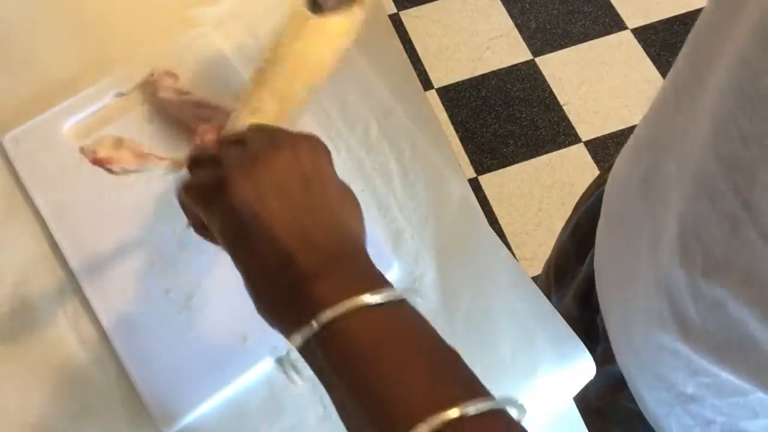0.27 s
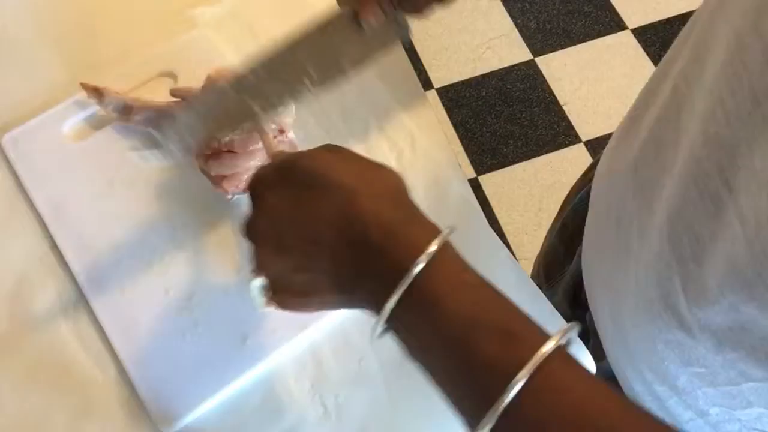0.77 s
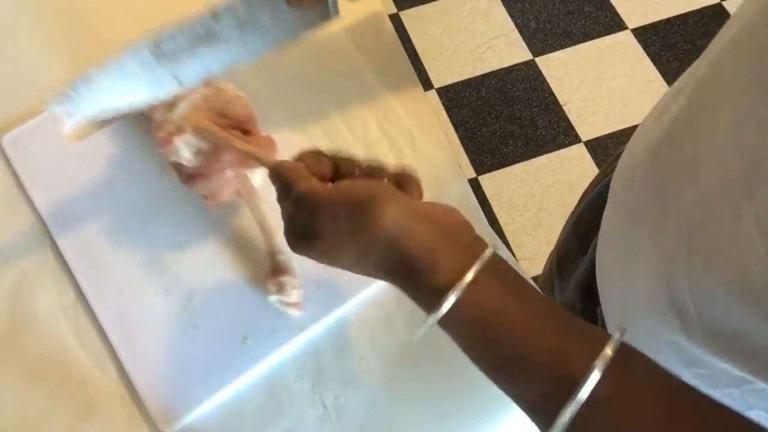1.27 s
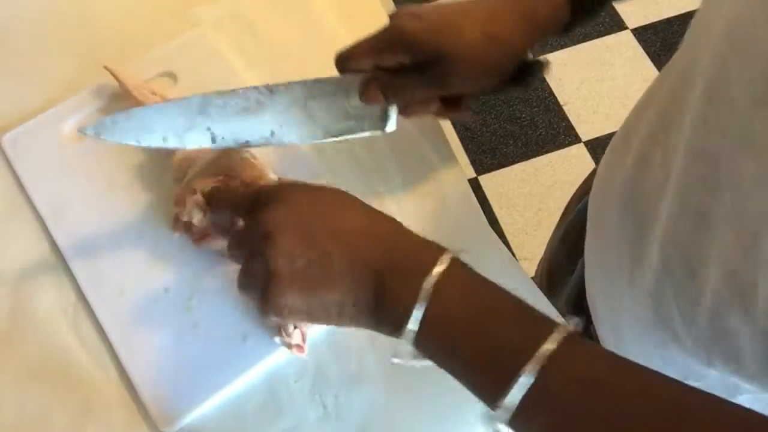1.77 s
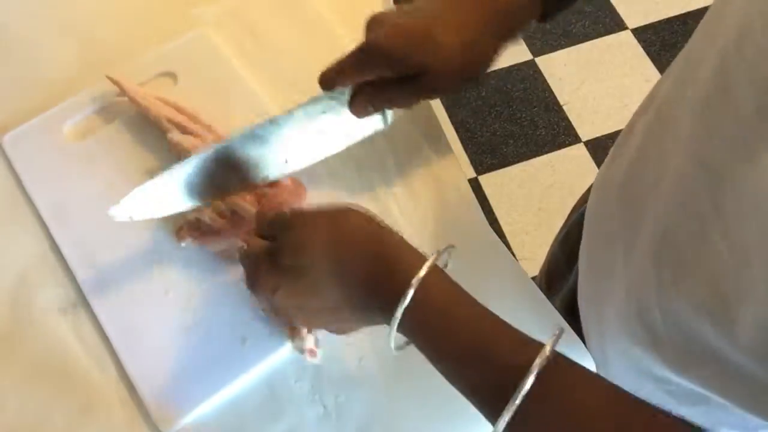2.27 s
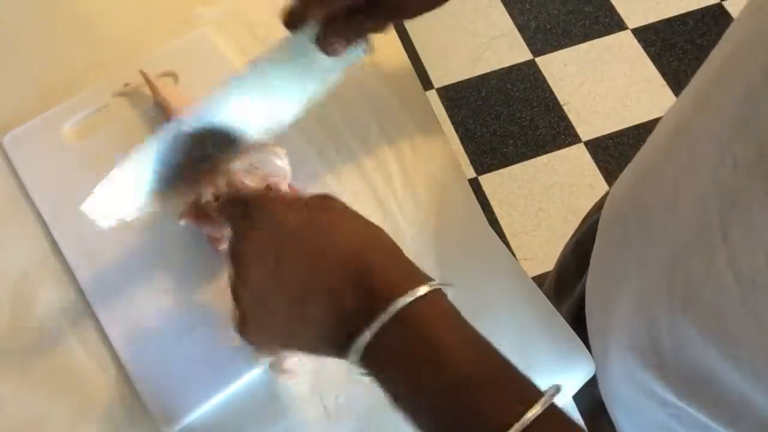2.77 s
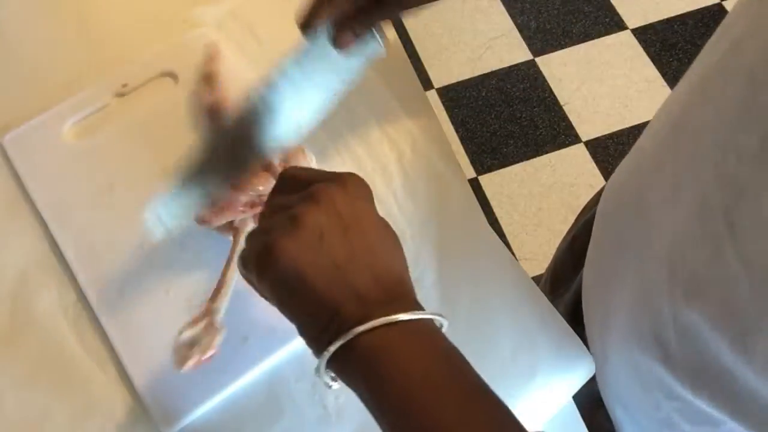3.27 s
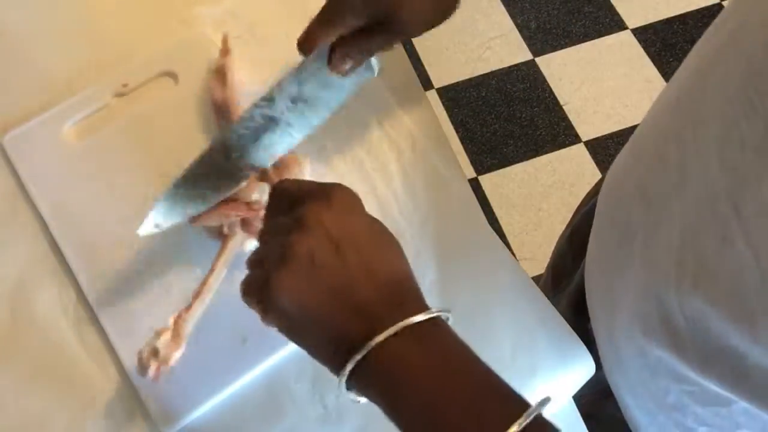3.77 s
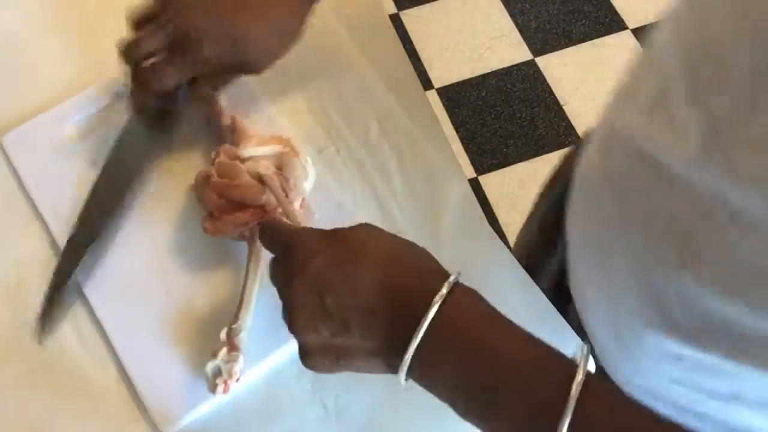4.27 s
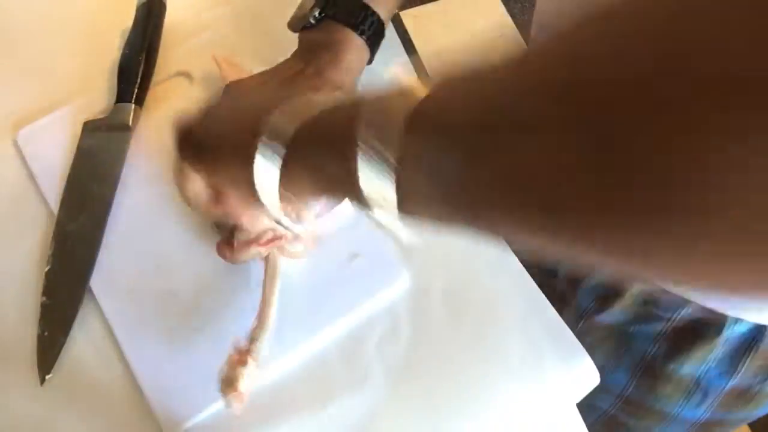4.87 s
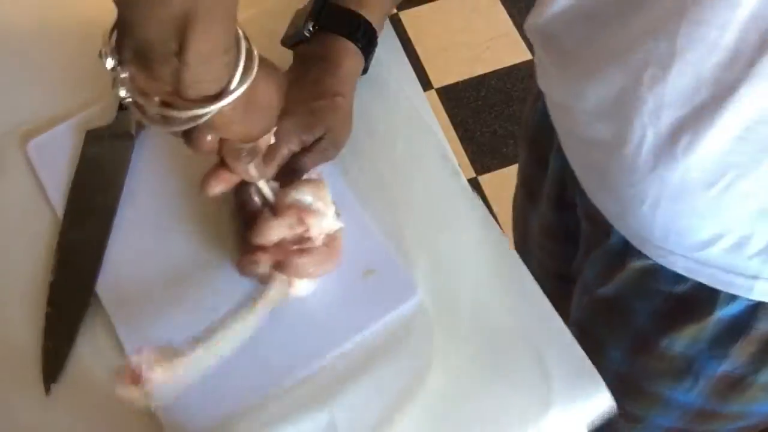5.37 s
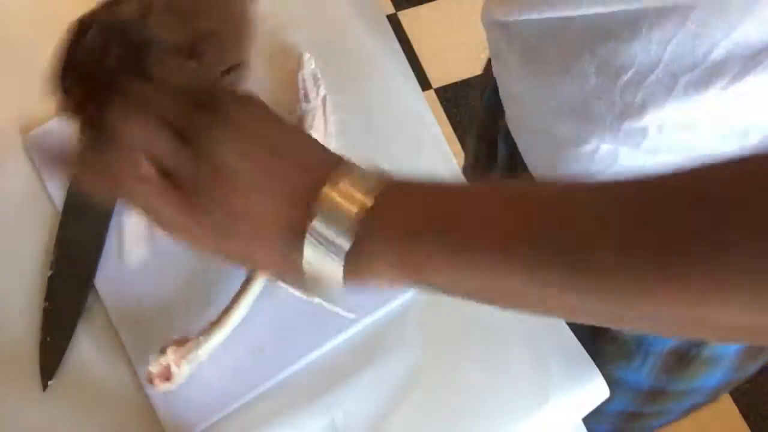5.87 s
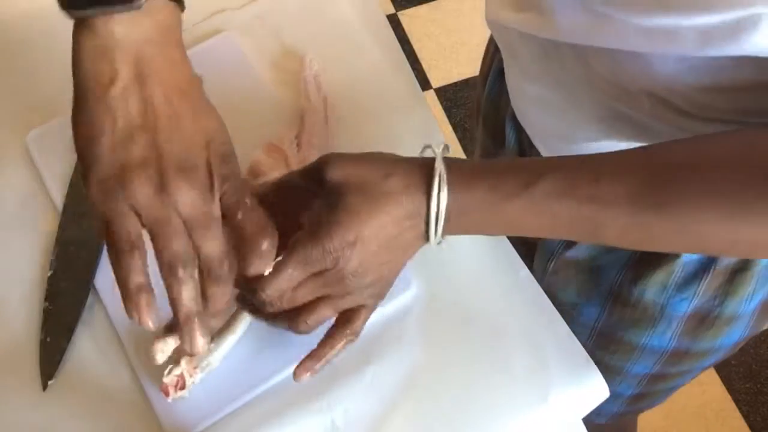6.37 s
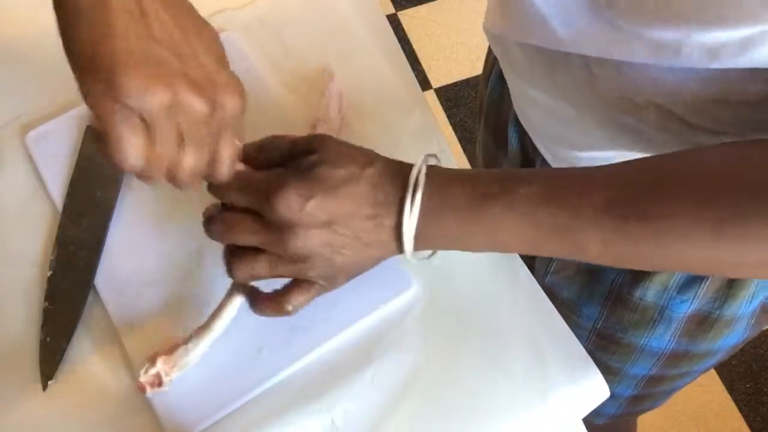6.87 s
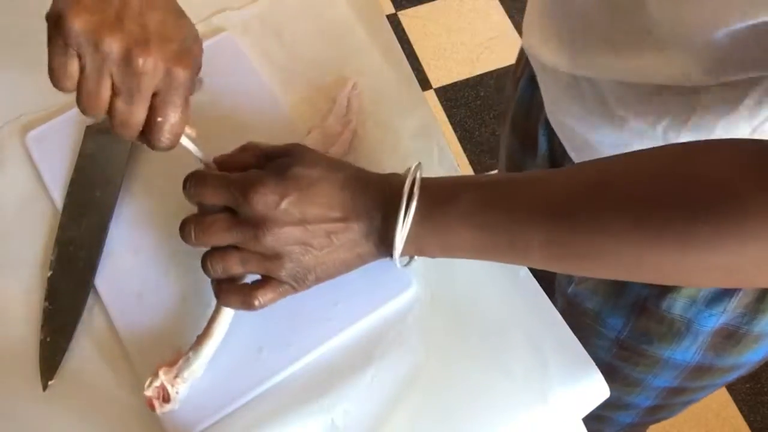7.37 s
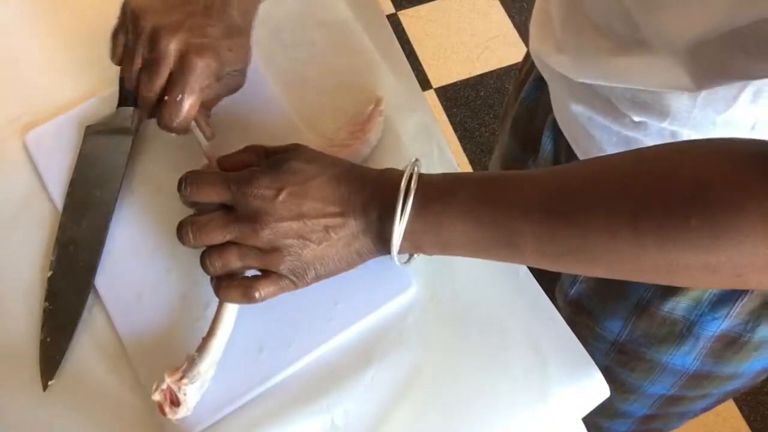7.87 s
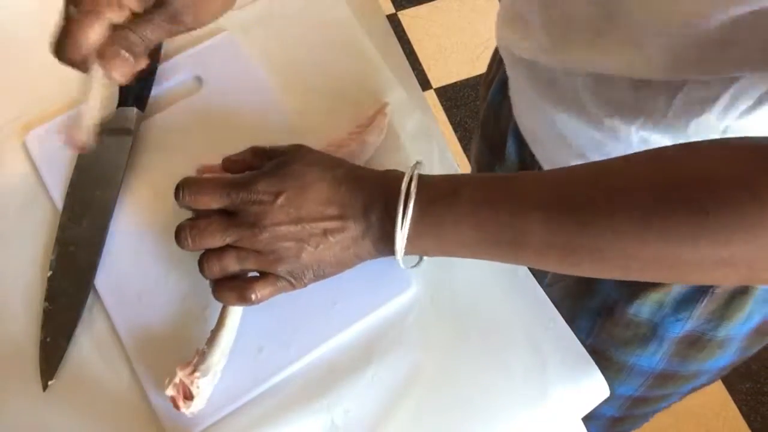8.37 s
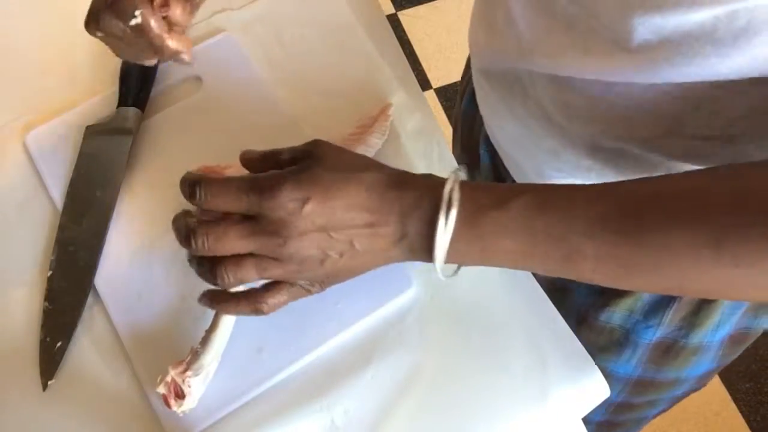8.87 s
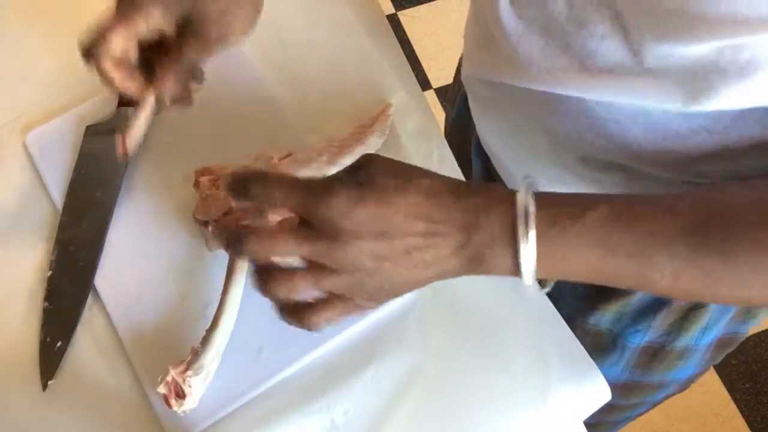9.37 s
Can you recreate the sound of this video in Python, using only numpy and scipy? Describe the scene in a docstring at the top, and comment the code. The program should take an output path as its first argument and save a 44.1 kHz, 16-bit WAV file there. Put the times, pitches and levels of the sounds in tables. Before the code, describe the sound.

A knife rasps and taps on bone, clatters onto a plastic board, then hands tear meat with gristle snaps and thin bangle clinks.

```python
"""A knife blade taps and rasps on bone: each stroke is many tiny catches that set off short ringing.
The knife then clatters onto a plastic board and meat is pulled off by hand, as a crackle of noise bursts.
Gristle snaps, thin bangles clink as fading tones, damp fingers squelch, and the bone is put down with a knock.
Soft bumps and a dull scuff pass by, and a small kitchen answers each sound with a short tail of noise.
Behind it all are rushing air, a low hum of a few sine tones and a thin electric buzz."""
import sys
import numpy as np
from scipy import signal
from scipy.fft import rfft, irfft, next_fast_len
from scipy.io import wavfile
from scipy.ndimage import map_coordinates

SR = 44100
rng = np.random.default_rng(int(sys.argv[2]) if len(sys.argv) > 2 else 0)


def to_wav(s):
    """Save 16-bit WAV."""
    ch = np.atleast_2d(s).T  # columns
    pcm = np.round(np.clip(ch, -1, 1) * 32767)  # PCM
    wavfile.write(sys.argv[1], SR, pcm.astype(np.int16))


N = 423801  # samples in the whole scene
SIZE = 16384  # samples in one event
T = np.arange(SIZE) / SR  # time within an event, in seconds
HZ = np.fft.rfftfreq(SIZE, 1 / SR)  # frequencies within an event

# In every table t60_s is the time in which a ring fades by 60 dB.


def amp(db):
    """Turn decibels into a gain."""
    return 10 ** (np.asarray(db) / 20)


def unit(x):
    """Scale to an average (rms) level of 1."""
    return x / np.sqrt(np.mean(x ** 2) + 1e-20)


def along(points, hz):
    """Read a curve of (Hz, value) points on a log frequency axis."""
    point_hz, values = np.transpose(points)
    return np.interp(np.log(hz + 1), np.log(point_hz + 1), values)


def wobble(rate):
    """A smooth random curve with rate new random values a second."""
    knots = rng.standard_normal(int(N * rate / SR) + 4)
    return map_coordinates(knots, [np.arange(N) * rate / SR])


def filtered(x, response):
    """Filter a whole track with a gain that depends on frequency."""
    padded = next_fast_len(N + SR // 2)
    spectrum = rfft(x, padded) * response(np.fft.rfftfreq(padded, 1 / SR))
    return irfft(spectrum, padded)[..., :N]


def colour(x, points):
    """Filter one event to a (Hz, dB) shape, with no sound ahead of its cause."""
    cepstrum = irfft(np.log(amp(along(points, HZ))))
    # folding the cepstrum forward makes the filter minimum-phase
    cepstrum[1:SIZE // 2] *= 2
    cepstrum[SIZE // 2 + 1:] = 0
    impulse = irfft(np.exp(rfft(cepstrum)))
    return signal.fftconvolve(x, impulse)[:SIZE]


def voiced(x, levels, length):
    """Steer each band of an event towards its level, judged over the first length seconds."""
    # low, mid, high and top band: from_hz, to_hz
    band_edges = [(90, 600), (600, 2000), (2000, 6500), (6500, 16000)]
    power = 2 * np.abs(rfft(x * (T < length))) ** 2 / (SIZE * length * SR)
    shape = []
    for db, (low_hz, high_hz) in zip(levels, band_edges):
        inside = (HZ > low_hz) & (HZ < high_hz)
        gain_db = db - 10 * np.log10(power[inside].sum() + 1e-20)
        # flat inside the band, sloping over to its neighbours
        shape += [(low_hz * 1.3, gain_db), (high_hz / 1.3, gain_db)]
    return colour(x, shape)


def ring(modes, scatter_db, detune):
    """Sum fading sine modes (Hz, dB, t60), with new strengths and slight pitch shifts at every contact."""
    chance = rng.standard_normal((len(modes), 2))
    total = 0
    for (hz, db, t60), (strength, shift) in zip(modes, chance):
        fade = amp(db + scatter_db * strength - 60 * T / t60)
        total = total + fade * np.sin(2 * np.pi * hz * (1 + detune * shift) * T)
    return total


def tone(hz, t60):
    """One resonance: a fading sine."""
    return amp(-60 * T / t60) * np.sin(2 * np.pi * hz * T)


def crack(t60):
    """The fading burst of noise at a contact."""
    return amp(-60 * T / t60) * rng.standard_normal(SIZE)


def slips(length, crest_share, rate, spread_db, edge_db):
    """Tiny catches of uneven size, swelling to a crest and stopping after length seconds."""
    crest = length * crest_share
    swell_db = np.interp(T, [0, crest / 2, crest, length], [edge_db, edge_db / 4, 0, edge_db / 1.65])
    happens = rng.random(SIZE) < rate / SR
    sizes = amp(spread_db * np.minimum(rng.exponential(size=SIZE), 3))
    signs = rng.choice([-1, 1], SIZE)
    return happens * sizes * signs * amp(swell_db) * (T < length)


def add(track, s, sound, room_db):
    """Place a sound at s seconds, with the kitchen's answer swelling over the next milliseconds."""
    # how long the kitchen rings at each pitch: pitch_hz, t60_s
    kitchen_decay = [(150, 0.32), (400, 0.44), (1000, 0.51), (3000, 0.44), (7000, 0.39), (15000, 0.24)]
    hz, t, grains = signal.stft(rng.standard_normal(SIZE), SR, nperseg=256)
    fading = grains * amp(-60 * t / along(kitchen_decay, hz)[:, None])
    tail = signal.istft(fading, SR, nperseg=256)[1][:SIZE]
    tail = tail * (1 - np.exp(-(T / 0.0015) ** 2))
    answer = amp(room_db) * tail / np.linalg.norm(tail)
    heard = signal.fftconvolve(sound, (T == 0) + answer)
    at = round(s * SR)
    heard = heard[max(-at, 0):max(N - at, 0)]
    track[max(at, 0):][:len(heard)] += heard


def scraping():
    """The edge catches and slips along the bone; the resonances change as it travels."""
    # strokes of the blade: start_s, length_s, level_db, squeak_hz, lowest_ring_hz
    strokes = [(-.03, 0.03, -26.5, 3570, 1300), (0.193, .029, -19, 2770, 700), (.426, .035, -19, 3540, 700),
               (0.931, 0.073, -24.5, 3840, 1900), (1.193, 0.067, -26, 3750, 1900),
               (2.068, 0.076, -30.5, 3640, 1700), (2.383, 0.019, -20.5, 3880, 1700),
               (2.604, .018, -17.5, 4040, 1700), (2.94, 0.052, -27, 3080, 1900),
               (3.205, 0.041, -20.5, 3540, 2800), (3.421, 0.038, -24, 3110, 2800),
               (3.639, 0.039, -26, 3140, 2700), (3.885, 0.032, -36.5, 2800, 2500)]
    # colour of the catches: pitch_hz, level_db (relative)
    rasp_colour = [(100, 22.5), (500, 11.5), (1000, -9), (1900, -1.5), (2350, -7.5), (3300, 0.5),
                   (4700, 0.5), (6200, -0.5), (8500, 1.5), (10400, -7), (11500, -4), (15500, -1.5)]
    # low, mid, high, top band against the stroke's level [dB]
    rasp_bands_db = (-34, -13, 0, -6.5)
    choke_hz, choke_db_per_octave = 1800, 3.5  # the mid band thins as the lowest ring climbs past this pitch
    track = np.zeros(N)
    for start, length, db, squeak_hz, lowest_hz in strokes:
        catches = slips(length, crest_share=.62, rate=7000, spread_db=3.5, edge_db=-19)
        catches = colour(catches, rasp_colour)
        # fade from one set of resonances to another
        travel = np.clip(T / length, 0, 1) * np.pi / 2
        first = signal.fftconvolve(catches * np.cos(travel), contact(squeak_hz))[:SIZE]
        last = signal.fftconvolve(catches * np.sin(travel), contact(squeak_hz))[:SIZE]
        # the firmer the blade is pressed, the more of its lower modes are choked
        rasp = colour(first + last, [(0.84 * lowest_hz, -11), (lowest_hz, 0)])
        low_db, mid_db, high_db, top_db = db + np.array(rasp_bands_db)
        choke_db = choke_db_per_octave * np.log2(lowest_hz / choke_hz)
        levels = [low_db, mid_db - choke_db, high_db, top_db]
        add(track, start, voiced(rasp, levels, length), room_db=-10.5)
    return track


def contact(squeak_hz):
    """How blade and bone answer one catch: a tick, the blade's modes, a squeak and the bone's many short modes."""
    squeak = amp(-23) * tone(squeak_hz, t60=.008)
    steel = amp(-30) * blade(t60=.035)
    bone = amp(-12.0) * crack(t60=0.0051)
    return (T == 0) + steel + squeak + bone


def blade(t60):
    """The blade's ring; grip and point of contact shift its modes a little."""
    # modes of the blade: pitch_hz, level_db (relative)
    blade_modes = [(700, -4.5), (1260, 2.5), (1750, -2.5), (2025, 2.5), (2710, 4), (3200, -11.5),
                   (3460, -3), (3810, -10), (4090, -3.5), (5040, -16.5), (5800, -21), (6060, -2),
                   (6480, -10.5), (6800, -4.5), (7320, -1), (7810, -8.5), (8450, -15), (9790, -0.5),
                   (10900, -14.5), (12100, 0.5), (13350, -3.5), (14900, -6)]
    return ring([(hz, db, t60) for hz, db in blade_modes], scatter_db=3, detune=.011)


def tapping():
    """The blade lands on the bone, damped by the meat."""
    # blade set against the bone: start_s, level_db
    taps = [(.1472, -32), (0.3887, -36), (0.9068, -26.5), (1.1903, -23.5), (2.346, -25), (2.5763, -25.5),
            (2.9142, -29.5), (3.175, -35), (3.4035, -33), (3.6303, -25.5), (3.8385, -35), (3.8913, -28)]
    # low, mid, high, top band against the tap's level [dB]
    tap_bands_db = (-24, -8.5, -1, -20)
    track = np.zeros(N)
    for s, db in taps:
        bone = amp(-2) * tone(2900, t60=.016)
        tap = crack(t60=0.025) + amp(-14.5) * blade(t60=0.034) + bone
        add(track, s, voiced(tap, db + np.array(tap_bands_db), 0.0077), room_db=-6.5)
    return track


def dropping_knife():
    """The knife clatters down on the board and its loose steel rings."""
    # blows of the knife: start_s, pitch_hz, level_db, boom_db, hardness_db, steel_ring_db
    knife_drops = [(4.2939, 1320, -20, -4, 1, -36), (4.3825, 1200, -25.5, -8, 4.5, -22),
                   (4.4138, 692, -22.5, 1, 7.5, -26), (4.419, 521, -19.5, 2, 1.5, -11),
                   (4.4705, 930, -26, -1, 7, -28.5)]
    # modes of the whole knife when let go: pitch_hz, level_db (relative), t60_s
    knife_modes = [(2379, -10, .09), (2780, -7, .07), (3180, -10, .08), (3531, -6, .1), (4113, -8, .11),
                   (5040, -9, .1), (6250, -8, .14), (6807, 0, .12), (7300, -4, .12), (8517, 1, .16)]
    track = np.zeros(N)
    for s, *hit, ring_db in knife_drops:
        steel = amp(ring_db) * ring(knife_modes, scatter_db=9, detune=0.0011)
        add(track, s, blow(*hit, steel=steel, board_db=-4), room_db=-7.0)
    return track


def knocking():
    """Bone and hand knock on the board, whose ring is damped by a hand."""
    # knocks: start_s, pitch_hz, level_db, boom_db, hardness_db
    knocks = [(1.137, 1264, -19, -11, -12.5), (2.7505, 410, -43, 6, -26), (4.0679, 1234, -27.5, -3, -15),
              (6.7806, 253, -46.5, 10.5, -6), (7.1258, 1270, -28, -24, -11.5),
              (7.1895, 2900, -31.5, -16, -3.5), (7.2128, 1470, -26.5, -17.5, -16),
              (8.2122, 1900, -28, -7.5, 1.5), (8.2158, 1000, -22, -6.5, 4), (9.607, 1467, -19.5, -29, -2.5)]
    track = np.zeros(N)
    for s, *hit in knocks:
        add(track, s, blow(*hit, steel=0, board_db=-7.5), room_db=-7.5)
    return track


def blow(hz, db, boom_db, hardness_db, steel, board_db):
    """One blow on the board: a clack at its own pitch, any steel that rings with it, and the board's boom."""
    # colour of a blow: pitch_hz, level_db (relative)
    clack_colour = [(40, -9), (120, -3), (250, 3.5), (520, 2.5), (800, -0.5), (1100, 2.5), (3500, 0.5),
                    (7500, -7.5), (9500, -16), (15500, -20.5)]
    # modes of the board on its counter: pitch_hz, level_db (relative), t60_s
    board_modes = [(135, -7, .3), (170, 0, .38), (205, -8, .25), (238, -3, .33), (325, -4, .16),
                   (374, -3, .14), (480, -5, .05), (545, -7, .05), (695, -6, .06)]
    pitch = amp(-4) * tone(hz, t60=.013)
    clack = colour(crack(t60=0.035) + pitch + steel, clack_colour)
    # a harder blow lifts the high band, and the top band faster
    top_db = -11 + 1.5 * hardness_db
    levels = db + np.array([boom_db, 0, hardness_db, top_db])
    boom = amp(db + boom_db + board_db) * ring(board_modes, scatter_db=3.0, detune=0.01)
    # the heavy board takes a few milliseconds to get moving
    boom = boom * (1 - np.exp(-T / 0.0035))
    return voiced(clack, levels, 0.0081) + boom


def pulling():
    """Wet meat tears in a crackle of parting fibres, denser the harder the pull."""
    # tears: start_s, length_s, level_db
    pulls = [(4.695, 0.07, -44), (4.754, 0.063, -40.5), (5.381, .105, -30.5), (5.726, 0.18, -49.5),
             (7.184, .064, -42)]
    # low, mid, high, top band against the tear's level [dB]
    pull_bands_db = (-26, -12, 0, -12)
    track = np.zeros(N)
    for start, length, db in pulls:
        fibres_per_s = 1500 * amp(.35 * (db + 31))
        tear = crackle(length, fibres_per_s)
        add(track, start, voiced(tear, db + np.array(pull_bands_db), length), room_db=-6.5)
    return track


def crackle(length, rate):
    """Wet fibres part one after another, each with a tick, a short tone and a little noise."""
    fibres = slips(length, crest_share=0.27, rate=rate, spread_db=5, edge_db=-10)
    snap = (T == 0) + amp(-9.5) * tone(3300, t60=0.00095) + amp(-19) * crack(t60=0.0047)
    return signal.fftconvolve(fibres, snap)[:SIZE]


def snapping():
    """Tough gristle gives way in single snaps of noise and a short tone."""
    # snaps: start_s, level_db, brightness_db
    snaps = [(1.553, -45, 6), (4.719, -47.5, 4), (4.7771, -33.5, -3), (4.9138, -46.5, -1),
             (4.9447, -45.5, 3), (5.1857, -50, -1.5), (5.3936, -32, 4), (5.4216, -28.5, 9),
             (5.429, -34.5, 2), (5.448, -29.5, 4.5), (5.451, -25, 6), (5.4894, -24.5, -1.5),
             (5.824, -40, -5), (5.846, -29, -8), (6.759, -45, -19), (7.312, -43, -14), (7.374, -45, -17),
             (7.496, -38.5, -5), (7.5083, -42.5, -8), (8.1798, -44, 13), (9.4526, -37, 6)]
    # low, mid, high, top band against the snap's level [dB]
    snap_bands_db = (-25, -15.5, 0, -12)
    # each band's change for one dB of brightness [dB]
    bright_slope = (-0.84, -0.46, 0.014, 1)
    usual_hz, scatter_octaves = 3050, 0.27
    track = np.zeros(N)
    for s, db, bright_db in snaps:
        hz = usual_hz * 2 ** (scatter_octaves * rng.standard_normal())
        snap = crack(t60=.009) + amp(-3) * tone(hz, t60=.005)
        levels = db + np.array(snap_bands_db) + bright_db * np.array(bright_slope)
        add(track, s, voiced(snap, levels, .01), room_db=-9.5)
    return track


def bangles():
    """Two thin hoops of nearly the same size strike each other and beat; the wrist soon damps their high ring."""
    # bangles meeting: start_s, level_db (before the fixed cut below)
    clinks = [(5.2127, -34), (5.3127, -19), (5.9544, -27.5), (5.9955, -42), (6.089, -35.5), (6.1925, -26),
              (6.2022, -30.5), (7.1294, -31.5), (7.1564, -24.5), (7.214, -20), (9.4443, -32)]
    # modes of the bangles: pitch_hz, level_db (relative), t60_s
    hoop_modes = [(4500, -12, 0.073), (5700, -7.5, 0.086), (6920, -6.5, 0.13), (8620, -7.5, 0.11),
                  (10200, -13.5, 0.12), (11100, -18, .1), (12300, -10, 0.15), (12310, -16, 0.14),
                  (12600, -7, 0.12), (13930, -12.5, 0.15), (14400, -8, .1), (14300, -9.5, 0.16),
                  (15560, -21, .08)]
    track = np.zeros(N)
    for s, db in clinks:
        first_hoop = ring(hoop_modes, scatter_db=3, detune=.002)
        second_hoop = .6 * ring(hoop_modes, scatter_db=4, detune=.015)
        chink = amp(-3) * crack(t60=.04)
        add(track, s, amp(db - 14.5) * (first_hoop + second_hoop + chink), room_db=-9)
    return track


def squelching():
    """Damp fingers work the bone free, from a smooth rub of dense ticks to single squelches."""
    # finger movements: start_s, length_s, level_db, ticks_per_s
    fidgets = [(6.798, .36, -59.5, 2700), (7.283, 0.25, -57.5, 2800), (7.78, 0.37, -57, 130)]
    # colour of wet skin: pitch_hz, level_db (relative)
    skin_colour = [(1500, -3), (2900, -10), (4000, 1), (5200, -4.5), (7500, -5), (9800, -3), (11500, -5),
                   (15500, -8)]
    # low, mid, high, top band against the movement's level [dB]
    finger_bands_db = (-15, -7, -0.5, -8)
    track = np.zeros(N)
    for start, length, db, rate in fidgets:
        squelch = colour(crackle(length, rate), skin_colour)
        add(track, start, voiced(squelch, db + np.array(finger_bands_db), length), room_db=-8.5)
    return track


def sticking():
    """Damp fingers keep sticking and letting go, in small ticks at random moments and pitches."""
    ticks_per_s, faintest_db, range_db = 3.4, -57, 12.5
    usual_hz, scatter_octaves = 6440, 0.73
    track = np.zeros(N)
    for moment, size, pitch in rng.random((round(ticks_per_s * N / SR), 3)):
        hz = usual_hz * 2 ** (scatter_octaves * (2 * pitch - 1))
        tick = crack(t60=0.011) + amp(6) * tone(hz, t60=.006)
        add(track, moment * N / SR, amp(faintest_db + range_db * size) * tick, room_db=-5)
    return track


def bumping():
    """Soft bumps pass through the counter as low tones that start gently."""
    # bumps: start_s, pitch_hz, level_db (before the gentle start)
    bumps = [(0.224, 52.4, -39), (1.331, 231, -36.5), (2.253, 276, -42.5), (8.218, 60, -22),
             (9.46, 133, -52)]
    track = np.zeros(N)
    for s, hz, db in bumps:
        gentle_start = 1 - np.exp(-T / 0.00655)
        add(track, s, amp(db) * tone(hz, t60=0.15) * gentle_start, room_db=-5)
    return track


def scuff():
    """Something slides softly over the board: a short, dull swell of noise."""
    # colour of the slide: pitch_hz, level_db (relative)
    slide_colour = [(300, -25), (600, -6), (800, 0), (1050, -6), (1500, -22), (4000, -45)]
    start_s, length_s = 9.37, .2
    track = np.zeros(N)
    swell = np.sin(np.pi * np.clip(T / length_s, 0, 1))
    slide = unit(colour(rng.standard_normal(SIZE), slide_colour))
    add(track, start_s, amp(-52.5) * swell * slide, room_db=-8)
    return track


def rushing_air():
    """Soft rushing air: coloured noise whose level wavers slightly."""
    # colour of the air: pitch_hz, level_db (relative)
    air_colour = [(20, -25.5), (36, -24), (52, 3), (80, -3.5), (140, -12.5), (190, -5.5), (400, -14.5),
                  (540, -19.5), (700, -17), (1700, -15.5), (2300, -25), (2800, -25), (3150, -24),
                  (3600, -33.5), (6400, -37), (7500, -47.5), (16000, -46.5)]
    noise = filtered(rng.standard_normal(N), lambda hz: amp(along(air_colour, hz)))
    return unit(noise) * amp(-49.0 + 0.17 * wobble(3))


def appliance_hum():
    """An unsteady appliance hum: low sines that drift in level and phase."""
    # lines of the hum: pitch_hz, level_db (rms, before the drift)
    hum_lines = [(58, -57.5), (120, -57), (176, -61.5), (240, -75.5), (294, -64.5), (406, -62.5)]
    t = np.arange(N) / SR
    hum = np.zeros(N)
    for hz, db in hum_lines:
        level = amp(db + 1.2 * wobble(4)) * np.sqrt(2)
        hum += level * np.sin(2 * np.pi * hz * t + .7 * wobble(5))
    return hum


def electric_buzz():
    """A thin buzz: one cycle of high overtones, repeated at twice the mains frequency."""
    # strength of the overtones: pitch_hz, level_db (relative)
    buzz_colour = [(2500, -30), (3800, -20), (4330, -5), (4800, -20), (5370, 0), (6000, -8), (6500, -8),
                   (7300, -30), (8700, -27), (10000, -40), (11200, -31), (15500, -26)]
    repeats_hz = 119.98
    orders = np.arange(20, 131)
    cycle = np.zeros(SIZE // 2 + 1, complex)
    random_phase = np.exp(2j * np.pi * rng.random(len(orders)))
    cycle[orders] = amp(along(buzz_colour, orders * repeats_hz)) * random_phase
    place_in_cycle = np.arange(N) / SR * repeats_hz % 1
    buzz = np.interp(place_in_cycle, np.arange(SIZE) / SIZE, irfft(cycle))
    return amp(-61) * unit(buzz)


def scene():
    """Everything heard from just above the board, in one channel."""
    knife = scraping() + tapping() + dropping_knife()
    hands = knocking() + pulling() + snapping() + bangles() + squelching() + sticking()
    soft = bumping() + scuff()
    background = rushing_air() + appliance_hum() + electric_buzz()
    return (knife + hands + soft + background)[None]


def record(dry):
    """Keep nothing above the band limit of 15900 Hz."""
    return filtered(dry, lambda hz: hz < 15900)


dry = scene()
out = record(dry)
to_wav(out)
```